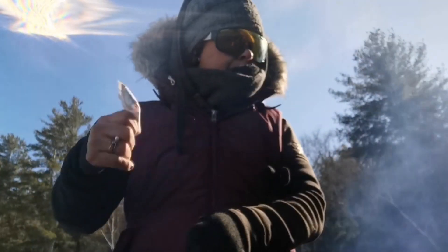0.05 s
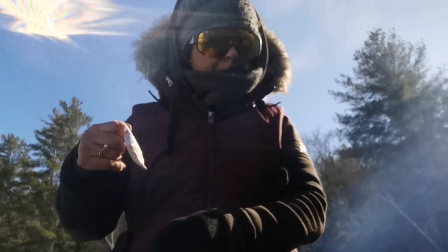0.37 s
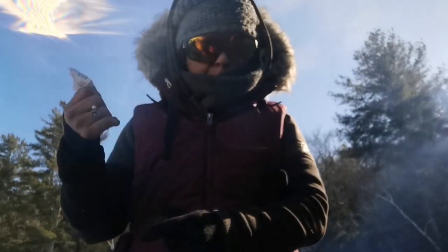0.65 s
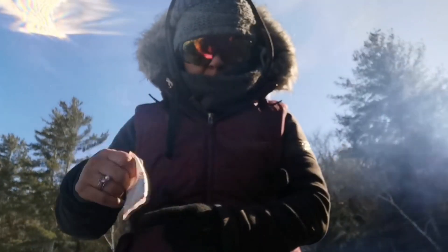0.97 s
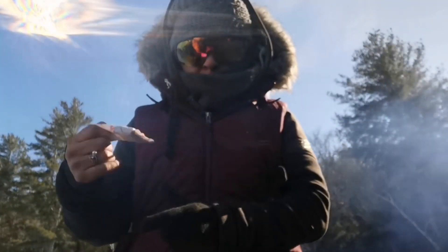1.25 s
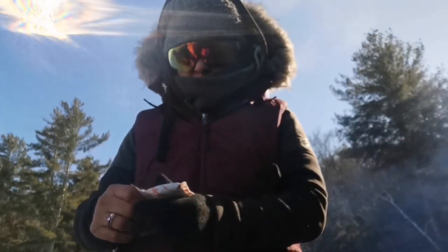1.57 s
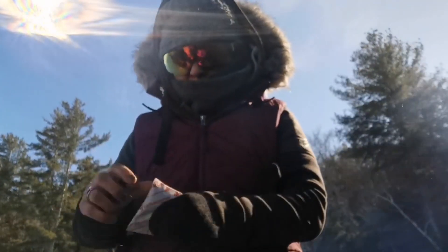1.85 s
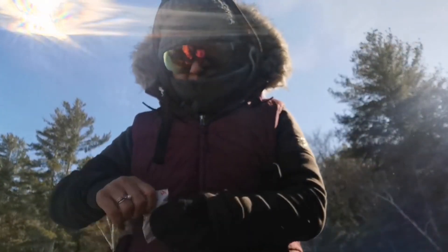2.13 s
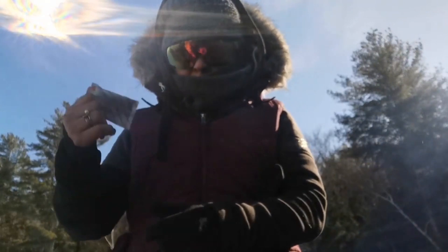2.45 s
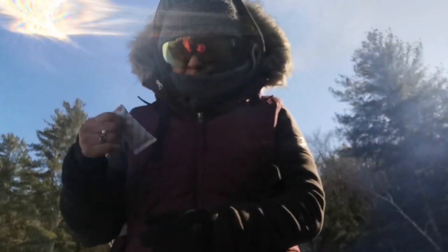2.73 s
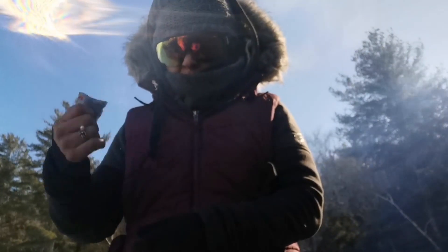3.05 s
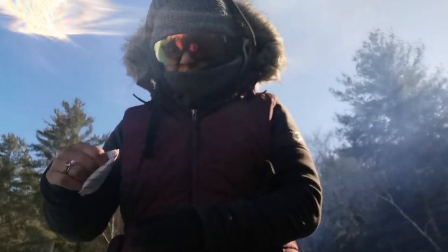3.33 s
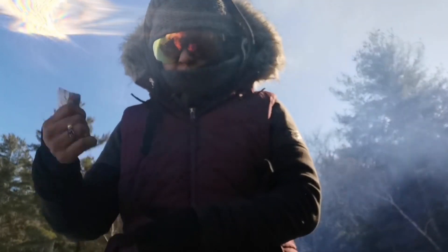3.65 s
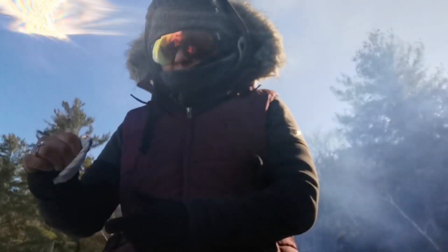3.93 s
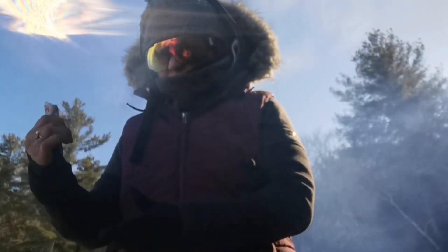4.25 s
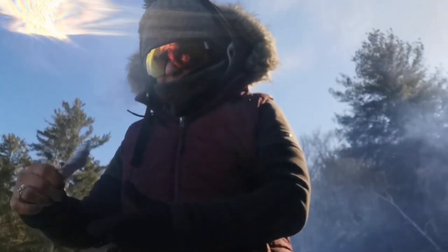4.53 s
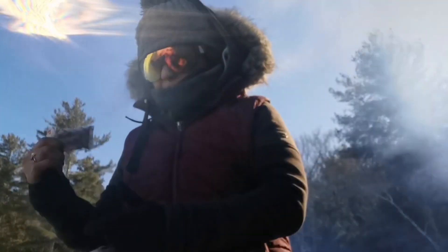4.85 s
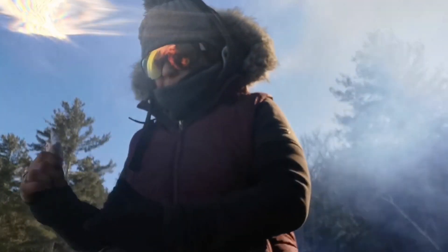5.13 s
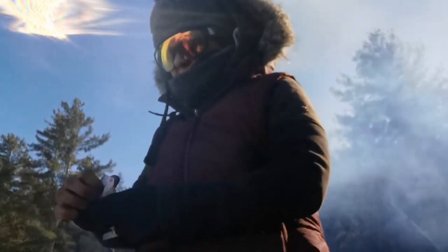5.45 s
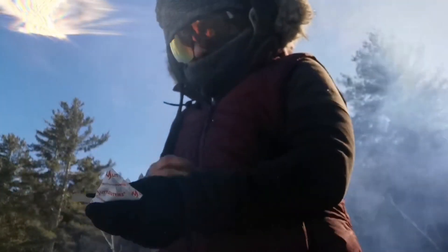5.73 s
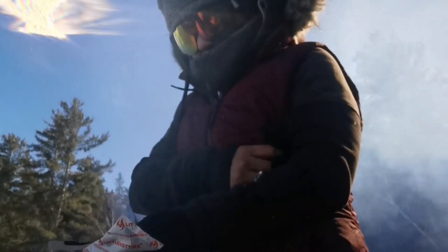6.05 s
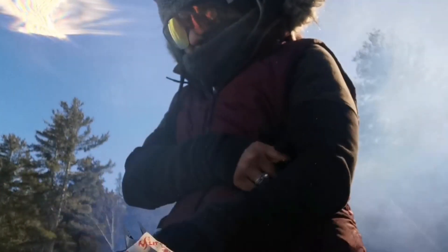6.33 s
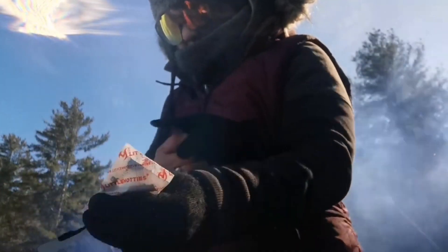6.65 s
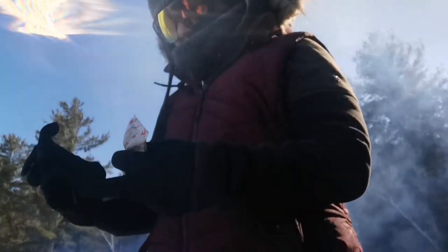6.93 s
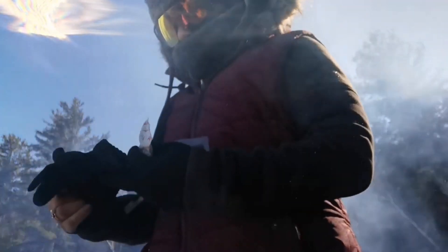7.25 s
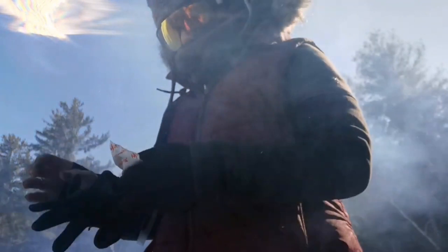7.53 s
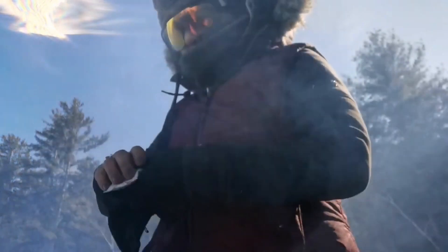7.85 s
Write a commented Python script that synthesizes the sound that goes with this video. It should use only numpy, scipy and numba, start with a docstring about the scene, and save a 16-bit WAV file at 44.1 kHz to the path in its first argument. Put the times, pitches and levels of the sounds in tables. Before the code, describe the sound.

Close to the microphone outdoors, a plastic hand warmer packet is shaken about five times a second, its filling sliding and hitting the end with a sharp crackle. After a pause with small crinkles and a finger scrape, a second run follows. Then a jacket sleeve swishes and a cuff rasps as a glove is pulled on. Faint air hisses behind, and light gusts bump the microphone.

```python
"""Outdoors, near pines: a hand warmer in its plastic packet is shaken, about five strokes/s, in two runs.
At each turn the filling slides, hits the end and buckles the film in a dense crackle; single creases snap
in between. A finger scrapes the film. A jacket sleeve rubs and the cuff rasps as a glove is pulled on.
Far air hisses, the trees rush, and gusts buffet the right microphone port."""
import sys
import numpy as np
from scipy import signal
from scipy.fft import rfft, irfft, next_fast_len
from scipy.io import wavfile
from scipy.ndimage import uniform_filter1d
from numba import njit

SR = 44100
rng = np.random.default_rng(int(sys.argv[2]) if len(sys.argv) > 2 else 0)


def wav_record(signal):
    """Record a signal, one row per channel, as 16-bit PCM in the file named by sys.argv[1]."""
    frames = np.transpose(np.atleast_2d(signal))
    bounded = np.clip(frames, -1, 1)
    # unit amplitude maps onto the largest positive 16-bit level
    quanta = np.round(bounded * 32767).astype(np.int16)
    wavfile.write(sys.argv[1], SR, quanta)


N = 347508
TIME_S = np.arange(N) / SR
GRID_HZ = np.maximum(np.arange(1025) * SR / 2048, 1)
THUD_HZ, SPARKLE_HZ = 1220, 5880  # crossovers: thud | body | sparkle

# Levels precede the gains in the functions. Thud and sparkle are relative to the row's level.
# fingers flex the film: start/s, end/s, level/dB, thud/dB, sparkle/dB
FILM_FLEXES = [(-.02, .05, -26.5, -19, -7), (.07, .16, -33.5, -21, -7), (.26, .38, -31.5, -23, -8),
               (2.89, 2.99, -38, -21, -8), (3.13, 3.22, -41, -18, -7.5), (5.415, 5.46, -30, -17, -11),
               (5.485, 5.555, -37, -7, -8)]
# filling slides at each turn: t/s, level/dB, run-on/s, thud/dB, sparkle/dB
FILLING_SLIDES = [(.165, -34, 0.14, -27, -12), (.385, -28, .17, -17.5, -9.5), (.605, -35, 0.27, -21, -9),
                  (.82, -37.5, 0.085, -35, -13), (1.04, -34, 0.13, -18, -10.5),
                  (1.245, -36, 0.095, -13, -12), (1.449, -34.5, .13, -10, -12),
                  (1.653, -39, 0.19, -10.5, -8), (3.367, -36, 0.075, -7.5, -9.5),
                  (3.56, -39, 0.063, -12, -15), (3.787, -36, 0.16, -1, -6.5),
                  (3.974, -38, 0.093, -9.5, -14), (4.179, -36.5, 0.1, -7, -15.5),
                  (4.39, -36, .15, -9.5, -10), (4.599, -38.5, 0.098, -13.5, -6),
                  (4.815, -39, 0.08, -12, -18), (5.025, -45, 0.12, -1, -5), (5.245, -36.5, 0.11, -11, -10)]
# arms move in the jacket: t/s, level/dB, thud/dB
SLEEVE_MOTION = [(0, -48, -12), (.8, -56, -11.5), (1.4, -64.5, 7.5), (1.8, -54.5, -1), (2.13, -53.5, -15),
                 (2.6, -55, -3), (3.08, -62, 1.5), (3.5, -60.5, 3), (4.3, -65, 6), (5.15, -61.5, 4.5),
                 (5.87, -56.5, -3), (5.99, -62.5, 9.5), (6.12, -54.5, -1), (6.38, -46.5, -3.5),
                 (6.58, -57, 4.5), (6.78, -58, 4), (7.3, -61, -5), (7.88, -61.5, 1)]
# sleeve and glove brush past: start/s, end/s, level/dB, thud/dB, sparkle/dB
SLEEVE_SWISHES = [(1.98, 2.1, -49.5, -35, 2), (2.46, 2.55, -49, -28, -3.5), (2.735, 2.785, -36, -21, -3),
                  (2.8, 2.9, -47.5, -20, -0.5), (5.585, 5.64, -43.5, -10, -8),
                  (5.655, 5.7, -39.5, -11, -4.5), (6.04, 6.23, -46, -5.5, -6.5),
                  (6.35, 6.48, -49, -9, -2.5), (6.805, 6.885, -46, -3, -14)]
# far hiss: t/s, level/dB
AIR_HISS = [(0, -45), (2.3, -59), (4.2, -55), (5.8, -59.5), (7.88, -55)]
# rush in the pines: t/s, level/dB
PINE_RUSH = [(0, -47), (2.5, -69), (5.6, -56.5), (6.5, -58), (7.3, -56.5), (7.88, -54.5)]
# rumble between gusts: t/s, level/dB
BREEZE_RUMBLE = [(0, -48), (1.8, -69), (2.4, -68), (4.2, -79), (5.3, -68), (7.88, -72.5)]
# single creases: t/s, level/dB, thud/dB, sparkle/dB
CREASE_SNAPS = [(.031, -26.5, -29, -9), (0.0454, -33, -29, -10), (.078, -27, -12, -20),
                (0.2546, -27.5, -20, -5), (.2978, -30, -32, -3), (0.3566, -33.5, -21, 3),
                (0.4265, -26, -20, -21), (0.474, -30, -12, -10), (0.511, -26, -18, -10),
                (0.641, -34, -30, -7), (0.691, -30, -22, -16), (0.7308, -26.5, -18, -12),
                (0.8847, -35.5, -26, -0.5), (0.9009, -26.5, -41, -14), (0.9445, -24.5, -30, -17),
                (1.0196, -30, -18, -6), (1.077, -35, -28, -2), (1.118, -24, -29, -12),
                (1.1451, -22.5, -24, -14), (1.2223, -23.5, -24, -9), (1.285, -10.5, -17.5, -8.5),
                (1.3223, -24, -20, -10), (1.342, -23.5, -28, -3), (1.4376, -29, -18, 0),
                (1.475, -33, -27, -8), (1.517, -27, -20, -8), (1.5675, -20, -41, -17),
                (1.724, -34.5, -32, 8), (1.7306, -30.5, -20, -17), (1.795, -27.5, -25, -18),
                (1.8865, -33.5, -10.5, -16), (1.9285, -35.5, -33, -15), (2.0978, -37, -40, -11),
                (2.2559, -39.5, -18, -13), (2.2917, -39.5, -30, -13), (2.5785, -43, -9, -13),
                (2.9419, -28, -40, -4), (2.9578, -30.5, -22, -3), (2.995, -29.5, -39, -12),
                (3.0877, -43, -13, -14), (3.1358, -28.5, -16.5, -22), (3.1632, -31.5, -16, -3),
                (3.1795, -30, -37, -14), (3.3463, -22.5, -28, -28), (3.545, -29, -14, -27),
                (3.611, -30.5, -26, -13), (3.665, -19.5, -16, -5.5), (3.684, -38, -13, -7),
                (3.9176, -25, -11, 1), (3.9928, -32, -29, -5), (4.018, -29, -16, -24),
                (4.2086, -27.5, -30, -13), (4.2597, -28.5, -29, -28), (4.3816, -24.5, -31, -21),
                (4.4306, -26, -20, -25), (4.519, -35, -25, -8), (4.5914, -19, -14, -13),
                (4.6375, -26.5, -35, -18), (4.682, -30.5, -25, -27), (4.8032, -20, -19, -23),
                (4.8585, -24.5, -31, -13), (5.056, -24.5, -37, -10), (5.1038, -26, -13, -32),
                (5.1191, -29.5, -26, -13), (5.2257, -20, -26, -16.5), (5.2669, -29.5, -29, -18),
                (5.3466, -29, -33, -2), (5.484, -31, -7, -23), (5.496, -32.5, -10, -19),
                (5.54, -30.5, -8.5, -6.5), (5.6315, -32.5, -28, -4.5), (5.895, -33, -0.5, -17),
                (6.041, -44, 3, -14), (6.6903, -33, -40, -9), (6.7202, -28.5, -14.5, -16.5),
                (7.133, -38, -27, -15), (7.1851, -40.5, -7.5, -12), (7.6285, -57, -15, -12),
                (7.7066, -44, -25, 1.5), (7.7997, -40.5, -31, -20), (7.8646, -39.5, -17, -8.5)]
# wind on the port: start/s, end/s, level/dB, low edge/Hz, top edge/Hz
PORT_GUSTS = [(0.035, 0.154, -30.5, 28, 141), (.157, 0.328, -45, 25, 71.4), (0.335, 0.42, -33, 28, 157),
              (0.511, 0.564, -26.5, 28, 210), (0.567, 0.64, -32, 28, 173), (0.658, 0.778, -26, 28, 122),
              (0.965, 1.098, -42, 112, 222), (1.892, 1.945, -46.5, 70, 148),
              (2.487, 2.536, -38.5, 120, 228), (3.16, 3.182, -35.5, 95, 180), (4.526, 4.6, -52, 28, 81),
              (5.206, 5.247, -52, 25, 99), (6.193, 6.226, -44, 70, 183), (6.317, 6.425, -32.5, 24, 60),
              (6.633, 6.744, -46.5, 28, 120), (6.856, 7.213, -53, 35, 139), (6.911, 6.947, -30.5, 45, 150),
              (7.389, 7.466, -46.5, 40, 129), (7.515, 7.578, -37, 32, 117)]
# filling hits the packet's end: peak t/s, level/dB, thud/dB, sparkle/dB, swell/s
FILLING_HITS = [(0.134, -21.5, -32, -5, 0.01), (0.157, -17, -22, -10, 0.0074),
                (0.173, -11.5, -26.5, -10.5, 0.0045), (0.381, -22, -22, -4.5, 0.0067),
                (0.392, -14, -26, -8.5, 0.0037), (0.598, -21, -18.5, -9, 0.0088),
                (0.61, -9.5, -26, -7.5, 0.0021), (0.812, -11.5, -39, -11.5, 0.0015),
                (0.824, -12.5, -28.5, -7, 0.0032), (1.036, -13.5, -23, -8, 0.0025),
                (1.047, -12, -43, -5.5, 0.0027), (1.239, -11, -42, -10.5, 0.0024),
                (1.25, -9.5, -28.5, -8.5, 0.0032), (1.452, -8, -25.5, -9.5, 0.0016),
                (1.643, -22, -27, -15, 0.0061), (1.662, -16.5, -19.6, -8, 0.0067),
                (3.374, -24.5, -15, -7, 0.0044), (3.564, -17.5, -24.5, -5.5, 0.0042),
                (3.775, -23.5, -8, -3, 0.0054), (3.796, -23.5, -10.5, -20, 0.0057),
                (3.975, -17.5, -11.5, -6, 0.006), (4.178, -16, -18.5, -7.5, 0.0053),
                (4.39, -11.5, -13.5, -11.5, 0.0034), (4.601, -8.5, -22.5, -13.5, 0.0018),
                (4.815, -15.5, -16, -3.5, 0.0048), (5.025, -14, -22.5, -14.5, 0.0047),
                (5.246, -21, -11, -8, 0.0053), (5.452, -24.5, -15.5, -8.5, 0.0035)]
# finger slides on the film: t/s, level/dB, resonance f/Hz
FINGER_SCRAPE = [(2.82, -90, 2800), (2.86, -52, 2700), (2.89, -45, 2680), (2.925, -39, 2600),
                 (2.96, -58, 2000), (2.99, -90, 1900)]
# spectral densities of film, jacket cloth and far air: f/Hz, level/dB
FILM_SPECTRUM = [(120, -23), (270, -7.5), (400, -15), (530, -9), (770, -12), (950, -19.5), (1600, -6.5),
                 (2300, -7.5), (3200, 0), (4600, 3), (5600, -14.5), (6800, -14.5), (8500, -26),
                 (11500, -27), (15500, -46.5)]
CLOTH_SPECTRUM = [(150, -10.5), (340, -1), (560, -0.5), (860, -11), (1100, -9.5), (1750, -1), (2350, -2),
                  (3200, 3.5), (4400, 7.5), (5400, -1), (6700, 4), (8600, -6.5), (11000, -6.5),
                  (15500, -25)]
AIR_SPECTRUM = [(50, -6), (150, 5), (330, 0.5), (550, -9), (830, -23), (1200, -8.5), (2300, -0.5),
                (3200, -4.5), (4500, -8.5), (5800, -18.5), (8000, -22), (15500, -22.5)]
# the ports hear differently: f/Hz, left minus right/dB
PORT_BALANCE = [(150, 4), (280, 13), (540, 6), (900, 1), (1600, -3), (2300, -4.5), (3200, -7.5), (4300, -6),
                (5600, -1), (6600, 6), (8200, -5), (9800, -9), (12000, -2), (14500, 0)]
# moving high-pass edge: t/s, f/Hz
BASS_EDGE = [(0, 283), (1.05, 430), (1.3, 198), (2.0, 270), (2.85, 286), (3.1, 243), (3.45, 378),
             (3.7, 159), (5.9, 116), (6.3, 313), (6.8, 264), (7.3, 540), (7.55, 243), (7.88, 192)]


def from_db(db):
    """Decibels to gain."""
    return 10 ** (np.asarray(db) / 20)


def rms_one(x):
    """Scale to rms 1."""
    return x / np.sqrt(np.mean(x ** 2) + 1e-20)


def in_time(rows):
    """Table columns, interpolated at every sample."""
    times_s, *columns = np.transpose(rows)
    return [np.interp(TIME_S, times_s, column) for column in columns]


def gain_curve(points):
    """A spectrum table as gains on GRID_HZ."""
    hz, db = np.transpose(points)
    return from_db(np.interp(np.log(GRID_HZ), np.log(hz), db))


def drift(per_s):
    """Slow random curve, rms 1."""
    knots = rng.standard_normal(N // 40)
    return rms_one(np.interp(TIME_S * per_s, np.arange(len(knots)), knots))


def hiss(apart):
    """Stereo noise, partly different per port; rms 1."""
    return rms_one(rng.standard_normal(N) + apart * rng.standard_normal((2, N)))


def crackle(per_s, spread_db, ring_s, even_s):
    """Envelope of random, fast-dying pulses; power levelled to 1 over even_s."""
    onsets = rng.random(N) < per_s / SR
    energy = onsets * from_db(spread_db * np.minimum(rng.exponential(1, N), 4)) ** 2
    power = signal.lfilter([1], [1, -np.exp(-2 / (ring_s * SR))], energy + 1e-6)
    return np.sqrt(power / np.maximum(uniform_filter1d(power, int(even_s * SR) + 1), 1e-9))


def band_power(db, thud_db, sparkle_db):
    """Power of thud, body and sparkle, as a column."""
    return from_db(db + np.array([[thud_db], [0], [sparkle_db]])) ** 2


def stroke(start_s, end_s, edge_s=0.016):
    """Envelope that swells, holds and fades."""
    return .5 + .5 * np.tanh(np.minimum(TIME_S - start_s, end_s - TIME_S) / edge_s)


def rub_power(rows):
    """Summed band power of a table of rubs."""
    return sum(band_power(*levels) * stroke(start_s, end_s) ** 2 for start_s, end_s, *levels in rows)


@njit
def moving_filter(x, hz, damping):
    """Swept two-pole filter; returns band-pass, high-pass."""
    band, high = np.zeros_like(x), np.zeros_like(x)
    step = 2 * np.sin(np.pi * hz / SR)
    for c in range(len(x)):
        low = 0.0
        for i in range(1, x.shape[1]):
            low += step[i] * band[c, i - 1]
            high[c, i] = x[c, i] - low - damping * band[c, i - 1]
            band[c, i] = band[c, i - 1] + step[i] * high[c, i]
    return band, high


def resonate(x, hz, damping, stages):
    """Cascaded band-passes at a fixed or moving hz; rms 1."""
    for _ in range(stages):
        x = moving_filter(x, hz * np.ones(N), damping)[0]
    return rms_one(x)


def minimum_phase(gains):
    """Causal impulse response with these gains."""
    cepstrum = irfft(np.log(gains + 1e-6))
    half = cepstrum.shape[-1] // 2
    cepstrum[..., 1:half] *= 2
    cepstrum[..., half + 1:] = 0
    return irfft(np.exp(rfft(cepstrum)))


def at_ports(drive, gains, lag_s):
    """Colour a drive at unit power gain; the right port lags by lag_s."""
    ports = gain_curve(PORT_BALANCE) ** np.array([[.5], [-.5]])
    ir = minimum_phase(gains * ports / np.sqrt(np.mean(ports ** 2, axis=0)))
    delay = np.exp(-2j * np.pi * GRID_HZ * np.array([[0], [lag_s]]))
    pad = 16  # samples of room for a negative lag
    ir = irfft(rfft(np.roll(ir, pad, axis=1)) * delay)
    return signal.oaconvolve(drive, ir / np.sqrt(np.sum(ir ** 2) / 2), axes=1)[:, pad:N + pad]


def radiate(drives, spectrum, lag_s):
    """A material's thud, body and sparkle bands, each with its own drive."""
    above_thud = 1 / (1 + (THUD_HZ / GRID_HZ) ** 8)
    above_body = 1 / (1 + (SPARKLE_HZ / GRID_HZ) ** 16)
    shares = 1 - above_thud, above_thud * (1 - above_body), above_body
    gains = gain_curve(spectrum)
    return sum(at_ports(drive, gains * np.sqrt(share), lag_s) for drive, share in zip(drives, shares))


def facets(patchy_db=3.0, aim_db=4.0, per_s=70):
    """Each film facet has its own pitch and aim, so narrow bands come and go; rms 1."""
    size = next_fast_len(N, True)
    bins = rfft(hiss(apart=0.48), size)
    hz = np.arange(size // 2 + 1) * SR / size
    band = np.searchsorted(np.geomspace(450, 12000, 21), hz)
    out = 0
    for k in np.unique(band):
        db = patchy_db * drift(per_s) + aim_db * drift(per_s) * np.array([[1], [-1]])
        out = out + irfft(bins * (band == k), size)[:, :N] * from_db(np.clip(db, -20, 7))
    return rms_one(out)


def crinkles(ringing, slide_power, powder_share=.25):
    """Flexing fingers and sliding filling set off a patter of grains and small creases."""
    powder = crackle(per_s=2500, spread_db=3.0, ring_s=0.00065, even_s=0.023)
    creases = crackle(per_s=200, spread_db=5.0, ring_s=.002, even_s=0.0343)
    patter = ringing * np.sqrt(powder_share * powder ** 2 + (1 - powder_share) * creases ** 2)
    power = band_power(0, thud_db=-4.5, sparkle_db=-1.0) * (slide_power + rub_power(FILM_FLEXES))
    return np.sqrt(power)[:, None] * patter


def jacket(uneven_db=2.0):
    """The weave catches in dense tiny slips: faint throughout, louder in each swish."""
    weave = hiss(apart=1.0) * crackle(per_s=6000, spread_db=2.5, ring_s=0.00077, even_s=0.055)
    db, thud_db = in_time(SLEEVE_MOTION)
    bands_db = np.array([db + thud_db, db, db]) + uneven_db * drift(per_s=25)
    motion_power = band_power(0, thud_db=-2.0, sparkle_db=-5.0) * from_db(bands_db) ** 2
    return np.sqrt(motion_power + rub_power(SLEEVE_SWISHES))[:, None] * weave


def far_air():
    """Distant hiss and a broad, hollow rush from the trees."""
    rush = resonate(hiss(apart=1.0), hz=1220, damping=0.31, stages=1)
    air = at_ports(hiss(apart=2.1), gain_curve(AIR_SPECTRUM), lag_s=-0.00018)
    return from_db(in_time(AIR_HISS)[0]) * air + from_db(in_time(PINE_RUSH)[0]) * rush


def breeze(left_db=-1.5, band_hz=(20, 170), lumpy_db=7.5):
    """Light wind leaves a faint, lumpy rumble on each port."""
    band = signal.butter(2, band_hz, "band", fs=SR, output="sos")
    rumble = signal.sosfilt(band, rng.standard_normal((2, N)))
    lumps = from_db(lumpy_db * np.array([drift(per_s=9), drift(per_s=9)]))
    return from_db(in_time(BREEZE_RUMBLE)[0] + np.array([[left_db], [0]])) * rms_one(rumble * lumps)


def ticks(ringing):
    """Even when only held, the film gives faint lone ticks."""
    lone = crackle(per_s=16, spread_db=3.0, ring_s=0.0023, even_s=1.0)
    return np.sqrt(band_power(-57.0, thud_db=-16.5, sparkle_db=-9.5))[:, None] * lone * ringing


def snaps(ringing, gain_db=-0.2, crack_s=0.0018, ring_s=0.0063, click_db=-10.0):
    """A crease flips with a click; the film rings for a few milliseconds."""
    out = np.zeros((3, 2, N))
    for at_s, *levels in CREASE_SNAPS:
        span = slice(int(at_s * SR), int((at_s + .03) * SR))
        t = TIME_S[span] - TIME_S[span][0]
        ring = ringing[:, span] * (np.exp(-t / crack_s) + np.exp(-t / ring_s))
        burst = ring / np.sqrt(np.sum(ring ** 2) / 2) + from_db(click_db) * (t == 0)
        burst *= np.sqrt(2 * .005 * SR / np.sum(burst ** 2))  # energy of 5 ms at power 1 per port
        out[:, :, span] += np.sqrt(band_power(*levels))[:, None] * burst
    return from_db(gain_db) * out


def gusts(left_db=-37.0, edge_s=0.0084, eddy_db=3.0):
    """Lumps of low turbulence, almost all on the right port."""
    out = np.zeros((2, N))
    white = rng.standard_normal((2, N + SR))
    eddies = from_db(eddy_db * drift(per_s=45))
    for start_s, end_s, db, low_hz, top_hz in PORT_GUSTS:
        span = slice(max(int((start_s - .04) * SR), 0), min(int((end_s + 0.054) * SR), N))
        swell = stroke(start_s, end_s, edge_s)[span]
        band = signal.butter(2, [low_hz, top_hz], "band", fs=SR, output="sos")
        lowpass = signal.butter(4, 1.055 * top_hz, fs=SR, output="sos")
        noise = white[:, span.start:span.stop + SR // 10]  # 0.1 s extra for the filters to settle
        rumble = signal.sosfilt(np.vstack([band, lowpass]), noise)[:, -len(swell):]
        lump = np.array([rms_one(port * swell * eddies[span]) for port in rumble])
        out[:, span] += from_db(db) * np.sqrt(np.mean(swell ** 2)) * lump
    return out * from_db([[left_db], [0]])


def filling_slides(gather_db_per_s=398, settle_db_per_s=59.5, stop_db_per_s=376):
    """Band power of the filling as it gathers speed, trickles on after the turn and stops."""
    power = np.zeros((3, N))
    for turn_s, db, run_on_s, thud_db, sparkle_db in FILLING_SLIDES:
        span = abs(TIME_S - turn_s) < .4
        t = TIME_S[span] - turn_s
        loss_db = gather_db_per_s * np.maximum(-t, 0) + settle_db_per_s * np.maximum(t, 0)
        loss_db += stop_db_per_s * np.maximum(t - run_on_s, 0)
        power[:, span] += band_power(db, thud_db, sparkle_db) * from_db(-loss_db) ** 2
    return power


def filling_hits(ringing, gain_db=-0.5, thud_lift_db=1.5, lead_db=-13.0, lead_s=0.0058, fall_ratio=0.73):
    """The filling runs into the packet's end and presses the film into a burst of buckles."""
    power = np.zeros((3, N))
    for peak_s, db, thud_db, sparkle_db, swell_s in FILLING_HITS:
        span = slice(max(int((peak_s - .06) * SR), 0), int((peak_s + 0.028) * SR))
        t = TIME_S[span] - peak_s
        hit = np.exp(-(t / np.where(t < 0, swell_s, swell_s * fall_ratio)) ** 2)
        lead = from_db(lead_db) ** 2 * np.exp(-abs(t) / np.where(t < 0, lead_s, lead_s / 2))
        power[:, span] += band_power(db, thud_db + thud_lift_db, sparkle_db) * (hit + lead)
    buckles = crackle(per_s=1600, spread_db=4.5, ring_s=0.0003, even_s=0.0041)
    return from_db(gain_db) * np.sqrt(power)[:, None] * buckles * ringing


def finger_scrape(left_db=-1.0):
    """Fast slips drive one film resonance, which sinks as the finger moves on."""
    db, hz = in_time(FINGER_SCRAPE)
    slips = hiss(apart=.5) * crackle(per_s=1500, spread_db=3.0, ring_s=.0006, even_s=.02)
    scrape = resonate(slips, hz, damping=0.16 * np.sqrt(2), stages=2)
    return from_db(db) * scrape * from_db([[left_db], [0]])


def cuff_rasp(left_db=-46.5, right_db=-52.5):
    """The cuff drags over the jacket; coarse slips drive one broad resonance."""
    slips = hiss(apart=0.48) * crackle(per_s=900, spread_db=4.0, ring_s=0.00067, even_s=.03)
    rasp = resonate(slips, hz=1690, damping=0.34, stages=2)
    return from_db([[left_db], [right_db]]) * stroke(start_s=6.06, end_s=6.235) * rasp


def surroundings(x, echo_gain=0.49, echo_s=.00346, echo_hz=3600, scatter_db=-18.0, t60_s=0.13):
    """A close surface reflects upper mids, combing the right side; ground and clothes add a short tail."""
    size = next_fast_len(N + SR // 10, True)
    hz = (np.arange(size // 2 + 1) + 1) * SR / size
    reflectance = np.exp(-np.log2(hz / echo_hz) ** 2)
    reflected = irfft(rfft(x[1], size) * reflectance, size)[:N]
    right = x[1] + echo_gain * np.interp(TIME_S - echo_s, TIME_S, reflected, left=0)
    t = TIME_S[:SR // 4]
    tail = rng.standard_normal((2, len(t))) * from_db(-60 * t / t60_s) * (t > .004)
    tail = from_db(scatter_db) * tail / np.sqrt(np.sum(tail ** 2) / 2)
    return np.array([x[0], right]) + signal.oaconvolve(x, tail, axes=1)[:, :N]


def thin_bass(x):
    """The bass thins and returns: four-pole high-pass on a moving edge."""
    for damping in 2 * np.cos(np.pi * np.array([1, 3]) / 8):
        x = moving_filter(x, in_time(BASS_EDGE)[0], damping)[1]
    return x


def scene():
    """Packet to one side, sleeve near the middle, far air, wind on the ports."""
    hit_ringing = facets()
    # time shifts: hits, snaps and crinkles ring different facets
    snap_ringing = np.roll(hit_ringing, SR, axis=1)
    fine_ringing = np.roll(hit_ringing, 2 * SR, axis=1)
    film = filling_hits(hit_ringing) + snaps(snap_ringing)
    film += crinkles(fine_ringing, filling_slides()) + ticks(fine_ringing)
    packet = radiate(film, FILM_SPECTRUM, lag_s=.000125)
    sleeve = radiate(jacket(), CLOTH_SPECTRUM, lag_s=-0.000047)
    close = packet + sleeve + finger_scrape() + cuff_rasp()
    return thin_bass(surroundings(close) + far_air()) + gusts() + breeze()


def record(dry, stopband_hz=17100):
    """Clip at full scale, then a steep low-pass."""
    lowpass = signal.cheby2(16, 90, stopband_hz, fs=SR, output="sos")
    return signal.sosfilt(lowpass, np.clip(dry, -1, 1))


dry = scene()
out = record(dry)
wav_record(out)
```